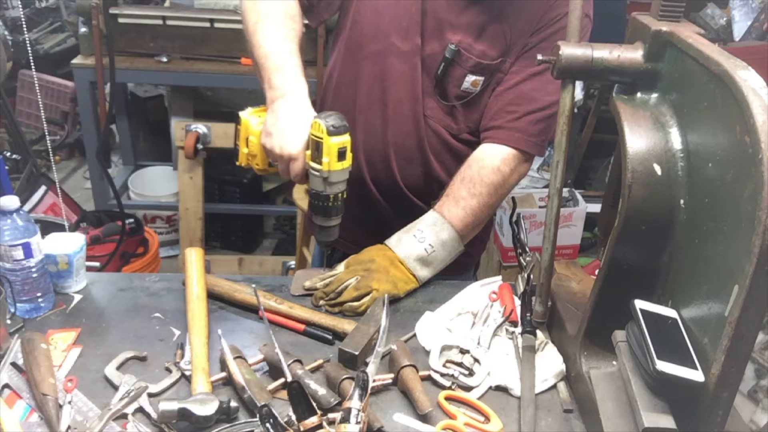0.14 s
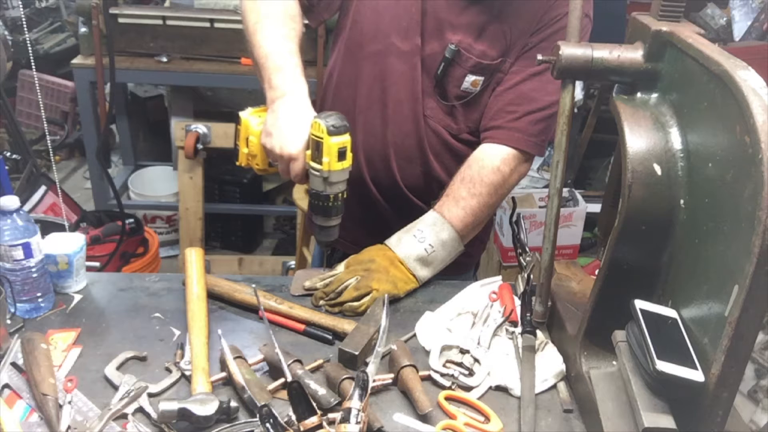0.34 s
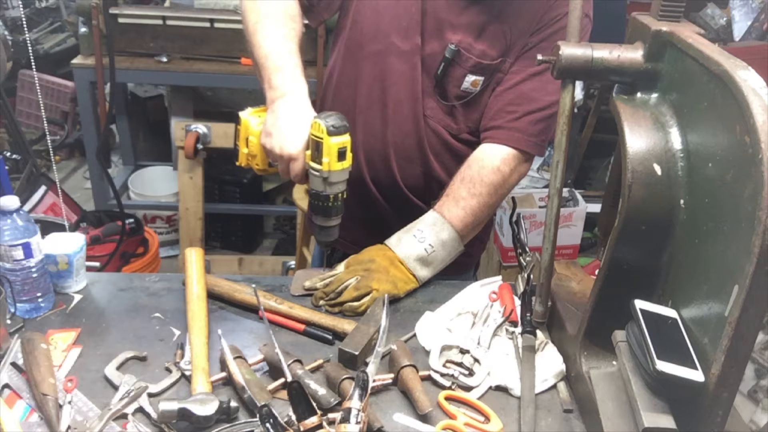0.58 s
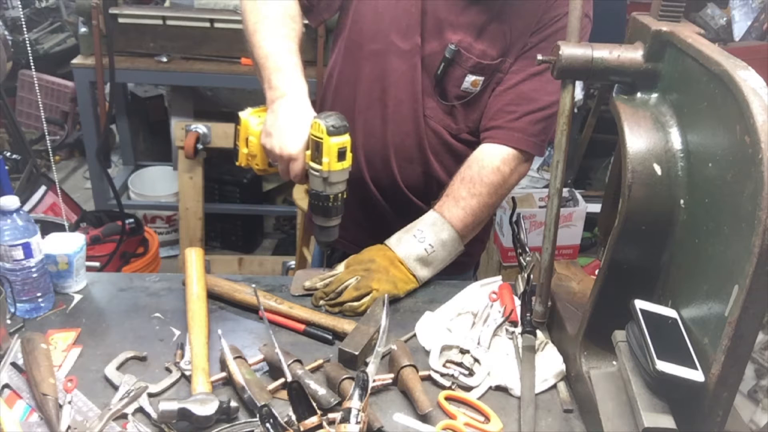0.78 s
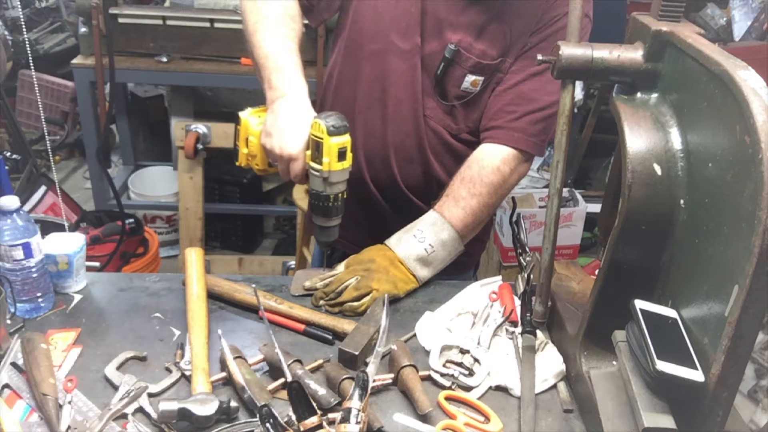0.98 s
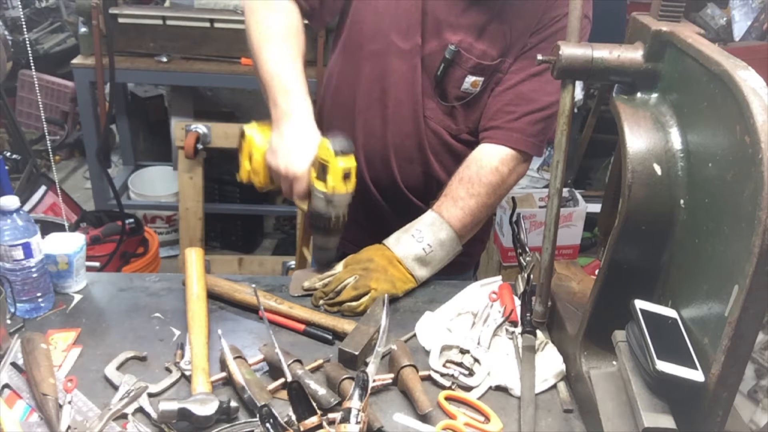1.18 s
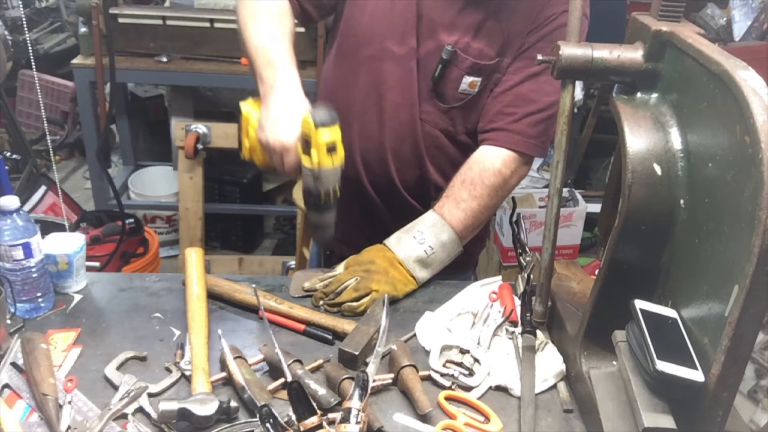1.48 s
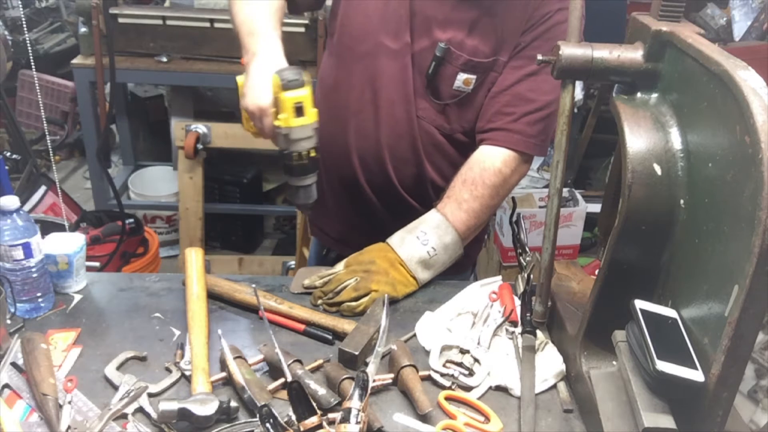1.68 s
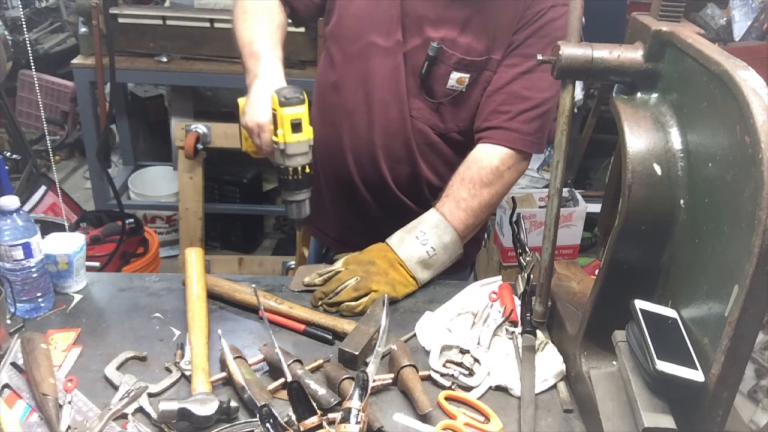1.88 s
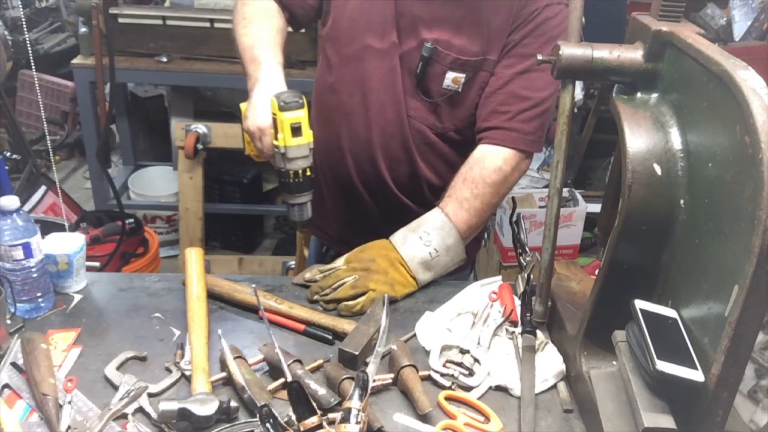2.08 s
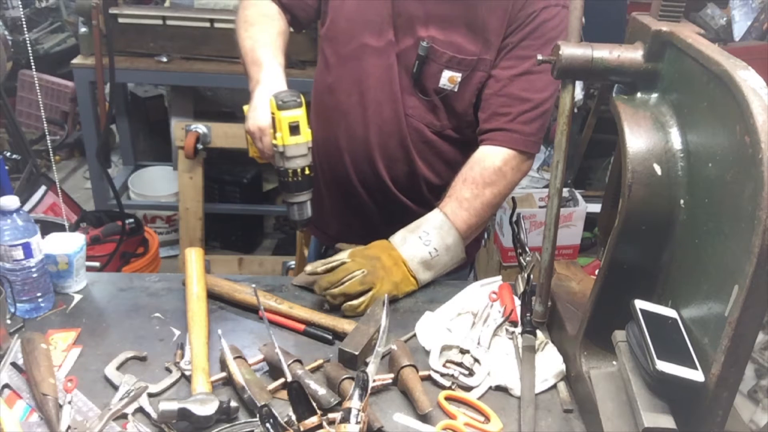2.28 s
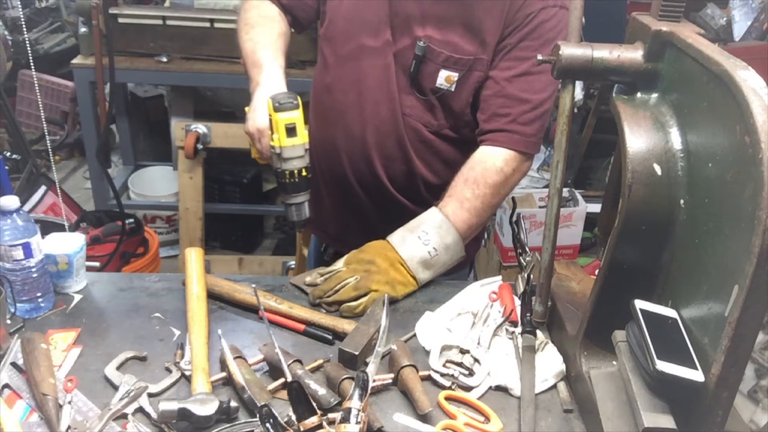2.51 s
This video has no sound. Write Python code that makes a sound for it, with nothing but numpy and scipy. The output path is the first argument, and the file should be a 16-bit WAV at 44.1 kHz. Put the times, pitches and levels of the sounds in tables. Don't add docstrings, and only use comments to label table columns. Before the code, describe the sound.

A cordless drill runs from the start with a steady high whine and bright gear hiss, close up in a workshop. Around 1.2 s its tone changes as it lifts, rising slightly, then it brakes at 1.65-1.7 s with clattering knocks. After a brief dip at 1.8 s, a steel plate scrapes sharply at 1.9 s and rings longer at 2.2-2.3 s; faint metal ticks and rasps follow to 2.6 s.

```python
import sys
import numpy as np
from scipy import signal
from scipy.fft import rfft, irfft
from scipy.io import wavfile

SR = 44100
rng = np.random.default_rng(int(sys.argv[2]) if len(sys.argv) > 2 else 0)


def volts_from_decibels(level):
    exponent = np.asarray(level, float) / 20
    return 10 ** exponent


def persist_wave(psi):
    counts = np.round(np.clip(psi, -1, 1) * 32767).astype(np.int16)
    wavfile.write(sys.argv[1], SR, np.atleast_2d(counts).T)


N = 116865
T = np.arange(N) / SR
HZ = np.arange(N // 2 + 1) * SR / N + 1


def rms_one(x):
    return x / np.sqrt(np.mean(x ** 2) + 1e-20)


def colour(x, points, extra_db=0):
    hz, db = np.transpose(points)
    curve_db = np.interp(np.log(HZ), np.log(hz), db) + extra_db
    return rms_one(irfft(rfft(x) * volts_from_decibels(curve_db), N))


def peaks_db(rows):
    return sum(db / (1 + (2 * (HZ - hz) / width) ** 2) for hz, width, db in rows)


def high_pass(x, hz):
    return signal.sosfilt(signal.butter(4, hz, "high", fs=SR, output="sos"), x)


def drift(rate):
    knots = rng.standard_normal(2000)
    return np.interp(T * rate * 2, np.arange(len(knots)), knots) * 1.22


def grit(spread_db):
    size_db = spread_db * np.minimum(rng.exponential(1, N), 4)
    return rms_one(rng.standard_normal(N) * volts_from_decibels(size_db))


def click(s):
    return 1. * (np.arange(N) == int(s * SR))


def ring(x, hz, t60):
    r, w = volts_from_decibels(-60 / (t60 * SR)), 2 * np.pi * hz / SR
    return signal.lfilter([0, np.sin(w)], [1, -2 * r * np.cos(w), r * r], x + 1e-18)


def strokes(rows):
    out = 0
    for s, attack, hold, fall, db in rows:
        rise = np.clip((T - s) / attack, 0, 1)
        since_hold = np.clip(T - s - attack - hold, 0, 1)
        out = out + volts_from_decibels(db - 60 * since_hold / fall) * rise
    return out


# t/s, turns f/Hz, gear hiss level/dB, share of the tool turned away [0-1]
ROTOR = [(0, 293.6, -34.5, 0.14), (0.602, 292.6, -35, 0.09), (1.1, 290.3, -35, 0.08),
         (1.172, 285.9, -35, 0.08), (1.234, 293.1, -34.5, 0.7), (1.402, 296.5, -35.5, 0.57),
         (1.521, 301.7, -35.5, 0.52), (1.598, 300.5, -35.5, 0.54), (1.651, 290.5, -34, 0.84),
         (1.67, 170, -39.5, 0.99), (1.689, 65, -36.5, 0.86), (1.709, 40.2, -68, 0.3)]
TONE_MULTIPLES = (1, 2, 7, 14, 16, 17.3, 21, 22)
# level/dB facing us, level/dB turned away
TONES_DB = [(-65, -58), (-66.5, -60), (-50.5, -51.5), (-43.5, -51), (-70, -53), (-62, -50), (-46, -52),
            (-67, -51)]
# f/Hz, level/dB (per Hz)
GEARS = [(24, -73), (40, -63), (264, -20), (290, -15.5), (1080, -14), (2100, -5.5), (3390, -9), (4100, -1),
         (12000, -12.5), (15600, -44.5), (22000, -120)]
GEARS_AWAY = [(24, -107), (40, -40), (80, -14), (264, -52.5), (297, -13), (934, -10.5), (2150, 0),
              (4960, -1), (12000, -9.5), (15600, -29), (22000, -120)]
FAN = [(12300, -75), (13000, 0), (13900, 8.5), (14600, 4), (15800, -1.5)]
# f/Hz, width/Hz, level/dB
HOUSING = [(2130, 470, 4.5), (2660, 110, 1), (4730, 580, 3), (784, 125, 6.5), (7670, 290, -7.5),
           (9380, 1200, 3.5), (5200, 300, -5),]
HOUSING_AWAY = [(8270, 280, 8.5), (9520, 220, 0), (5150, 250, 6.5), (12500, 1600, -4)]


def drill():
    s, *columns = np.transpose(ROTOR)
    turns, hiss_db, away = [np.interp(T, s, column) for column in columns]
    away = np.clip(away, 0, 1)
    notch_hz = 12780
    notch_db = peaks_db([(notch_hz, 330, -11)])
    housing_db = peaks_db(HOUSING) - 40 * (HZ > notch_hz)
    facing = colour(grit(0.91), GEARS, housing_db + notch_db)
    turned = colour(grit(1.4), GEARS_AWAY, housing_db + peaks_db(HOUSING_AWAY) + notch_db / 2)
    gears = np.sqrt(1 - away) * facing + np.sqrt(away) * turned
    fan_db = -4.5 - 9 * away + (1 + 2 * away) * drift(30)
    fan = colour(grit(3.9), FAN, notch_db) * volts_from_decibels(fan_db)
    out = volts_from_decibels(hiss_db) * (gears * volts_from_decibels(.6 * drift(25)) + fan)

    phase = 2 * np.pi * np.cumsum(turns * (1 + 0.00043 * drift(25.16))) / SR
    braking = np.clip(8 * (1 - turns / 285), 0, 1)
    for k, (near_db, away_db) in zip(TONE_MULTIPLES, TONES_DB):
        brake_db = 11 * braking * {7: 1, 14: .5}.get(k, -1)
        level_db = near_db + (away_db - near_db) * away + 1.5 * drift(8.23)
        level_db += hiss_db - ROTOR[0][2] + brake_db
        out += np.sqrt(2) * volts_from_decibels(level_db) * np.sin(k * phase + rng.uniform(0, 2 * np.pi))
    return out


# t/s, peak level/dB, f/Hz, t60/s
KNOCKS = [(1.6539, -23, 5700, 0.0078), (1.653, -24, 1839, 0.01), (1.669, -28, 2070, 0.008),
          (1.677, -21, 1540, 0.011), (1.678, -24, 2050, 0.012), (1.681, -32, 4300, .006),
          (1.682, -36, 594, 0.033), (1.684, -22.5, 2060, 0.0084), (1.687, -34, 2390, .012),
          (1.713, -30, 1610, 0.0082), (1.713, -40.5, 700, 0.034), (1.9, -19.5, 3390, .012),
          (1.9, -37, 6430, .008), (1.923, -21.5, 3500, .012), (1.949, -33, 3020, .02),
          (1.99, -46.5, 777, 0.13), (1.995, -45, 3280, .012), (2.0429, -43.5, 2600, 0.032),
          (2.2242, -18, 2950, .016), (2.2242, -20, 3760, 0.0085), (2.224, -21, 6300, 0.006),
          (2.403, -38, 2890, .014), (2.402, -39, 6030, .012), (2.4246, -35, 2920, 0.013),
          (2.434, -38.5, 318, 0.057), (2.4477, -28.5, 2980, .016), (2.446, -41.5, 794, 0.073),
          (2.5674, -39.5, 2160, .016), (2.579, -45, 2200, .016), (2.587, -44, 2180, .014),
          (2.604, -44, 2200, .016), (2.614, -46, 2100, .016)]


def knocks():
    crack_noise = high_pass(signal.lfilter([.8], [1, -.6], rng.standard_normal(N)), 820)
    out = np.zeros(N)
    for s, db, hz, t60 in KNOCKS:
        out += volts_from_decibels(db) * high_pass(ring(click(s), hz, t60), hz / 2)
        out += crack_noise * strokes([(s, .0005, .0005, t60 * 0.78, db - 20.5)])
    return out


BIT_HZ = (2510, 5640, 830)
# level/dB, t60/s, t/s when touched and silenced
BIT = [(-55, 5.0, 1.845), (-57, 5.0, 1.865), (-61, 5.0, 1.87)]


def bit():
    out = np.zeros(N)
    for hz, (db, t60, end) in zip(BIT_HZ, BIT):
        touched = np.clip((end - T) / .015, 0, 1)
        out += volts_from_decibels(db + 2.5 * drift(25)) * ring(click(1.684), hz, t60) * touched
    return out


def scrape(rows, modes, widen, wander_db, hiss_db, minor_db):
    push = strokes(rows) * volts_from_decibels(1.5 * drift(120))
    contacts = grit(2.0)
    out = volts_from_decibels(hiss_db) * high_pass(signal.lfilter([.45], [1, -1.1, .28], push * contacts), 700)
    minor_hz = np.geomspace(4100, 15200, 24) * rng.uniform(.97, 1.03, 24)
    minor = [(hz, 120, minor_db - hz / 2000) for hz in minor_hz]
    for k, (hz, width, db) in enumerate([*modes, *minor]):
        t60 = np.log(1000) / np.pi / (width * widen)
        fed = push * np.roll(contacts, 1511 * k) * volts_from_decibels(wander_db * drift(45))
        fed = signal.lfilter(*signal.butter(1, [hz - 250, hz + 250], "band", fs=SR), fed)
        even_out = np.sqrt(4 * np.log(1000) * widen * width / (40 * SR * t60))
        out += volts_from_decibels(db) * ring(fed, hz, t60) * even_out
    return out


PLATE_HZ = (2576, 2672, 2860, 3100, 4362, 4700, 5120, 5790, 7020, 7395, 8000, 8890, 10250, 12500)
PLATE_WIDTH_HZ = (35, 40, 60, 60, 50, 70, 60, 55, 70, 50, 60, 55, 50, 70)
PLATE_DB = [-15, -12, -21, -24, -20, -16, -19, -21, -23, -21, -27, -28, -23, -27]
# t/s, attack/s, hold/s, fall t60/s, level/dB
DRAGS = [
    (2.2237, 0.00033, 0.011, 0.1, -25),
    (2.232, 0.025, 0.049, 0.072, -17.5),
    (2.312, 0.0029, 0.024, 0.1, -31.5),
    (2.357, 0.0012, 0.004, 0.048, -41),
]


def plate_drags():
    modes = zip(PLATE_HZ, PLATE_WIDTH_HZ, PLATE_DB)
    return scrape(DRAGS, modes, widen=1.2, wander_db=1.5, hiss_db=-21, minor_db=-23)


EDGE_DB = [-13, -11, -20, -17, -33, -18, -12.5, -18.5, -36, -38, -35, -24, -20.5, -24]
# t/s, attack/s, hold/s, fall t60/s, level/dB
EDGE_DRAGS = [
    (1.86, 0.0039, 0.063, .05, -53.5),
    (1.8975, 0.0023, 0.012, 0.043, -21.5),
    (1.91, 0.0034, 0.016, 0.071, -29.5),
]


def edge_drags():
    modes = zip(PLATE_HZ, PLATE_WIDTH_HZ, EDGE_DB)
    return scrape(EDGE_DRAGS, modes, widen=1.29, wander_db=1.5, hiss_db=-16.5, minor_db=-23)


# t/s, hold/s, f/Hz, level/dB
SINGS = [(1.898, 0.0091, 2580, -23.5), (1.899, 0.016, 4600, -34), (1.908, 0.015, 4665, -35),
         (1.927, 0.0094, 2550, -41), (2.11, 0.057, 1950, -49.5), (2.2225, .013, 2640, -21.5),
         (2.237, .032, 2592, -17.5), (2.277, 0.021, 2582, -15.5), (2.256, 0.014, 3070, -24.5),
         (2.228, 0.018, 4355, -30), (2.249, 0.016, 4362, -20.5), (2.273, .024, 4385, -37),
         (2.291, 0.0061, 4690, -32), (2.258, 0.014, 5118, -26.5), (2.244, 0.0108, 10250, -33),
         (2.269, 0.018, 10275, -29), (2.269, 0.016, 7392, -23.5), (2.292, 0.014, 7030, -32.5),
         (2.286, 0.011, 7100, -41), (2.318, 0.011, 5250, -36), (2.406, .018, 4650, -56),
         (2.502, 0.014, 3100, -50), (2.529, 0.013, 1930, -56.5), (2.357, 0.039, 2610, -48.5)]


def sings():
    out = np.zeros(N)
    for s, hold, hz, db in SINGS:
        phase = 2 * np.pi * np.cumsum(hz * (1 + .003 * drift(70))) / SR
        flutter = volts_from_decibels(.8 * drift(90))
        out += np.sqrt(2) * np.sin(phase) * flutter * strokes([(s, .004, hold, .045, db)])
    return out


# f/Hz, width/Hz, level/dB
SCRAP = [(1947, 16, -5.5), (2600, 25, -7.5), (3328, 200, -9), (4800, 40, -8.5), (5500, 110, -13),
         (6680, 80, -20.5), (7300, 84, -22.5), (8870, 60, -25)]
# t/s, attack/s, hold/s, fall t60/s, level/dB
RASPS = [
    (1.801, 0.0024, 0.015, 0.15, -64),
    (1.988, 0.00089, 0.0029, 0.078, -49),
    (2.043, 0.00096, 0.023, 0.5, -58),
    (2.078, 0.023, 0.051, 0.16, -47.5),
]


def scrap_rasps():
    return scrape(RASPS, SCRAP, widen=2.7, wander_db=2.0, hiss_db=-0.76, minor_db=-37)


# f/Hz, width/Hz, level/dB
SWARF = [(1966, 34, -15.5), (2680, 60, -8.5), (2950, 130, -12), (3670, 100, -11), (940, 45, -16.5),
         (6030, 98, -14), (5170, 60, -19), (8830, 57, -23)]
# t/s, attack/s, hold/s, fall t60/s, level/dB
TICKS = [
    (2.398, 0.0026, 0.0048, 0.067, -49),
    (2.424, .001, 0.003, 0.038, -47.5),
    (2.432, 0.011, 0.0042, 0.14, -46),
    (2.478, 0.0033, 0.015, 0.089, -60),
    (2.503, 0.0031, 0.031, 0.1, -54.5),
    (2.525, .004, 0.0084, 0.1, -59),
    (2.567, 0.00056, 0.016, 0.22, -57),
]


def swarf_ticks():
    return scrape(TICKS, SWARF, widen=3.6, wander_db=3.3, hiss_db=-1.3, minor_db=-41)


# t/s, attack/s, hold/s, fall t60/s, level/dB
BUMPS = [
    (1.17, 0.044, 0.03, 0.33, -49.5),
    (1.82, 0.019, 0.042, .1, -61),
    (1.9, 0.0017, 0.016, 0.18, -40.5),
    (2.0, 0.015, 0.033, 0.21, -60),
    (2.1, 0.025, 0.032, 0.31, -57),
    (2.23, 0.0059, 0.043, 0.37, -51),
    (2.4, 0.033, .03, .15, -57.5),
    (2.52, 0.0091, 0.05, 0.32, -62.5),
]
THUDS = [
    (1.24, .02, 0.032, 0.17, -59),
    (1.32, 0.055, 0.049, 0.086, -58.5),
    (1.8, .01, .04, .1, -64),
    (1.86, 0.028, 0.044, 0.33, -46.5),
    (2.11, 0.04, 0.027, 0.29, -62),
    (2.23, 0.021, 0.082, 0.22, -65.5),
    (2.4, .03, 0.11, 0.37, -69),
]


def bench():
    out = np.zeros(N)
    for rows, edges_hz in ((BUMPS, (201, 493)), (THUDS, (32, 105))):
        band = signal.butter(2, edges_hz, "band", fs=SR, output="sos")
        out += strokes(rows) * rms_one(signal.sosfilt(band, rng.standard_normal(N)))
    return out


def room(x):
    t = T[:SR // 2]
    noise = rng.standard_normal(len(t)) * (t > .004)
    dull = signal.sosfilt(signal.butter(2, 4200, fs=SR, output="sos"), noise)
    dull_t60, bright_t60 = 0.18, 0.21
    tail = dull * volts_from_decibels(-60 * t / dull_t60) + (noise - dull) * 0.59 * volts_from_decibels(-60 * t / bright_t60)
    return volts_from_decibels(-16) * signal.fftconvolve(x, tail / np.sqrt(np.sum(tail ** 2)))[:N]


# f/Hz, level/dB (per Hz)
SHOP = [(30, -6), (300, -5), (1000, -4), (3000, -12), (7000, -25), (15000, -44)]


def shop():
    return volts_from_decibels(-68) * colour(rng.standard_normal(N), SHOP)


def scene():
    near = drill() + knocks() + bit()
    near += plate_drags() + edge_drags() + sings()
    near += scrap_rasps() + swarf_ticks()
    return (near + room(near) + bench() + shop())[None]


def low_pass(x):
    return signal.sosfilt(signal.butter(12, 16520, fs=SR, output="sos"), x)


def record(dry):
    change_s, fade_out_s, fade_in_s, end_fade_s = 1.792, .04, .01, .01
    dip = np.maximum((change_s - T) / fade_out_s, (T - change_s) / fade_in_s)
    fades = np.clip(dip, .05, 1) * np.clip((T[-1] - T) / end_fade_s, .4, 1)
    top_cut = signal.ellip(14, .5, 65, 15720, fs=SR, output="sos")
    return low_pass(signal.sosfilt(top_cut, dry * fades))


dry = scene()
out = record(dry)
persist_wave(out)
```